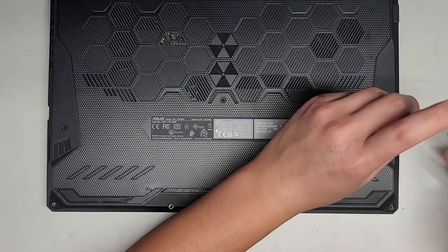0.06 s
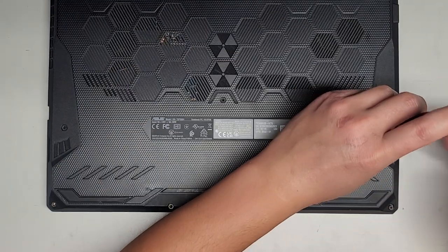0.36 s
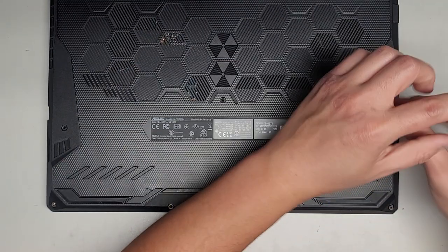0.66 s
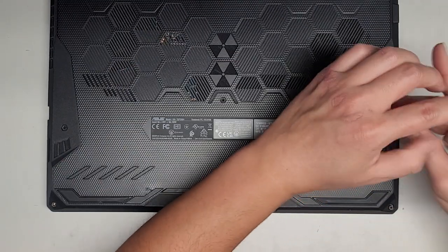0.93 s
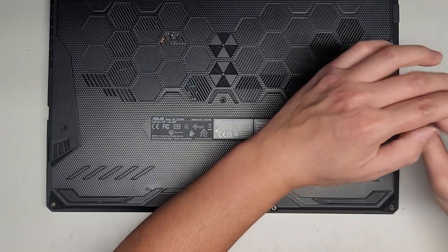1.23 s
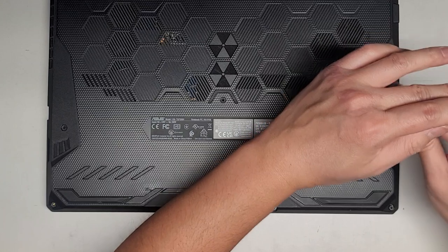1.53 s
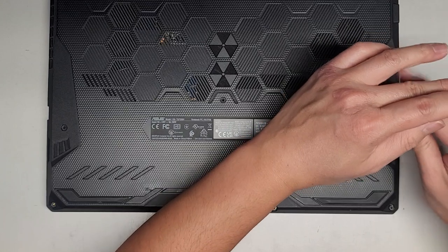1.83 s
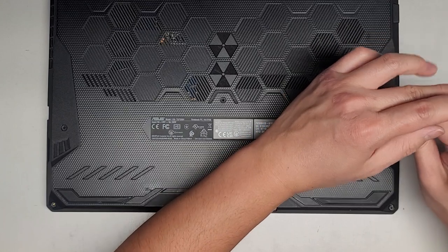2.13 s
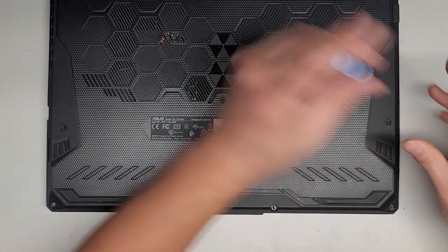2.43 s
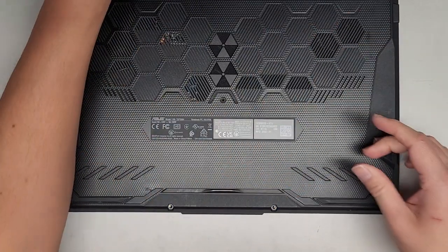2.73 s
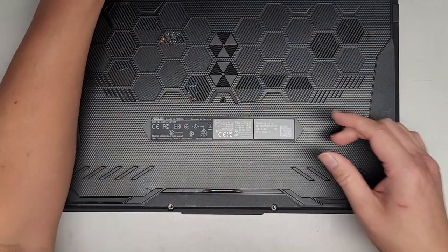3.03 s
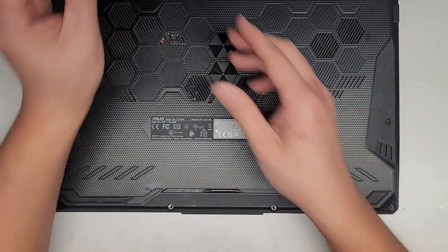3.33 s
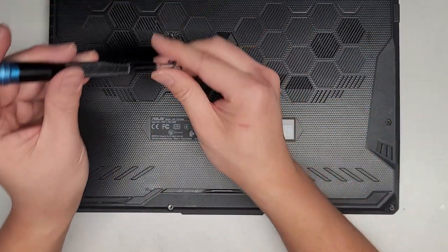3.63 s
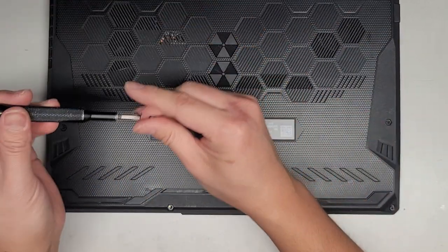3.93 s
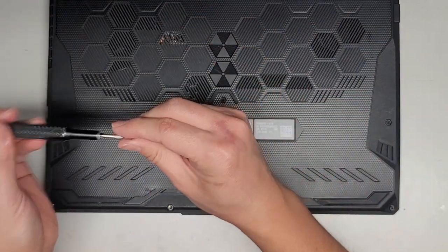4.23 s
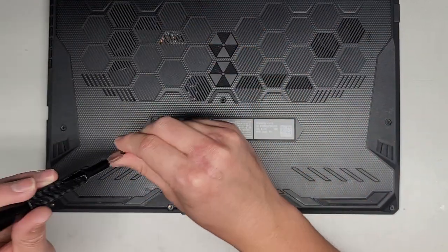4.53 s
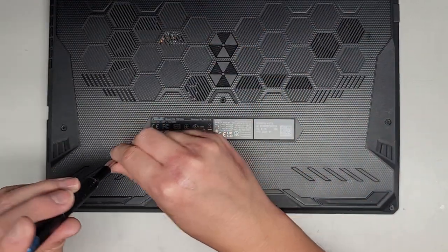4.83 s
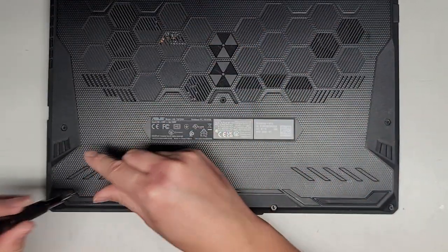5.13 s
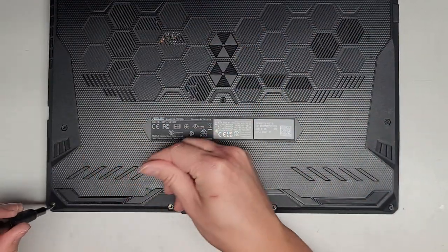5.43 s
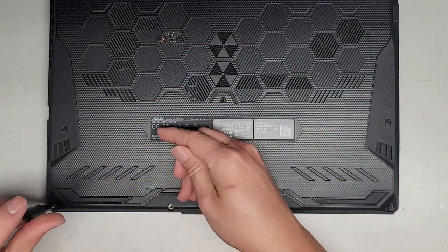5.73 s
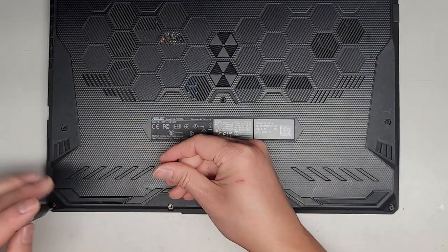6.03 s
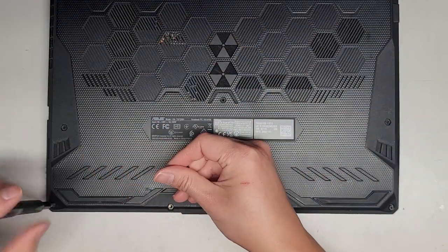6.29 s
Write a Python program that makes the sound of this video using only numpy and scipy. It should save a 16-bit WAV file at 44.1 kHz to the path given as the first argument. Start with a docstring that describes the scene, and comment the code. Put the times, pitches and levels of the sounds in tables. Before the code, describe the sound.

A deep thud, then plastic crunches and snaps twice as hands and a small screwdriver work on a laptop cover in a quiet room.

```python
"""A deep thud, then a crunch and snap of plastic: hands and a small screwdriver work on a laptop's
bottom cover, on a bench in a quiet room. Each touch is a short run of stick-slip friction that rings
the cover's resonances; twice its edge crunches and snaps home under pressure. The steel bit ticks
lightly on the screws, fingers rub the textured plastic, and pushes rock the bench in a few more thuds.
Faint room air and the low hum of a motor lie under everything."""
import sys
import numpy as np
from scipy import signal
from scipy.fft import rfft, irfft
from scipy.io import wavfile
from scipy.ndimage import uniform_filter1d

SR = 44100
rng = np.random.default_rng(int(sys.argv[2]) if len(sys.argv) > 2 else 0)


def wrap_up_sound(samples):
    """Save the sound to the file named by the first command line argument, as 16-bit audio."""
    columns = np.atleast_2d(samples).T
    # keep every value between -1 and 1, then stretch to whole-number steps
    tamed = np.clip(columns, -1, 1)
    steps = np.round(tamed * 32767).astype(np.int16)
    wavfile.write(sys.argv[1], SR, steps)


N = 289186
TOUCH_SAMPLES, LEAD_SAMPLES = 16384, 2048   # span of one touch, and the part kept for its build-up
CUTOFF_HZ = 15900


# Fingers and tool knock on the cover, or its edge snaps home. Each row: release time in seconds,
# build-up time constant in seconds, 60 dB decay time in seconds, base level in dB, treble lost to a
# soft contact in dB, resonance of the touched spot in Hz, its lift in dB.
COVER_TOUCHES = [(.3335, 0.0015, 0.063, -48.5, 23, 1680, 18), (.358, 0.00029, 0.04, -40.5, 56, 600, 4.5),
                 (.409, 0.0023, 0.2, -55.5, 23.5, 1760, 18), (.452, 0.0031, 0.081, -39.5, 33, 1700, 10),
                 (0.4936, 0.0048, 0.037, -33.5, 8, 1740, 12), (.677, 0.00045, .055, -63, 39, 1830, 19),
                 (.757, 0.0053, 0.074, -60.5, 21.5, 5150, 6.5), (.798, 0.006, .09, -58, 21, 635, -11),
                 (.81, 0.0056, .036, -52, 30, 640, -6), (.864, 0.0026, .034, -60, 22.5, 3330, 20.5),
                 (1.002, 0.0026, 0.05, -52, 16, 1750, 7.5), (1.103, 0.00065, 0.067, -53.5, 27, 4900, 10.5),
                 (1.428, 0.0082, 0.036, -47.5, 14.5, 800, 14), (1.457, .003, 0.047, -60, 1, 1090, 10),
                 (1.489, 0.007, 0.037, -51.5, 5, 6500, 6.5), (1.593, 0.0049, 0.046, -60.5, 10, 720, 8),
                 (1.608, 0.0037, .08, -62.5, 3, 614, 3), (2.395, 0.0022, 0.059, -59, 16, 6400, 13.5),
                 (2.739, 0.0047, 0.04, -61.5, 15, 1500, 11), (2.994, .002, 0.088, -72, -0.5, 9550, 13),
                 (3.044, 0.0018, 0.022, -45, 104, 1030, -2), (4.066, 0.0038, 0.16, -50, 8.5, 396, 7),
                 (5.522, 0.0045, 0.081, -49.5, 38.5, 1180, 7), (5.569, 0.00088, 0.061, -47, 56, 1200, 5),
                 (5.8793, .003, 0.074, -39, 9, 1660, 8), (5.8946, 0.00029, 0.027, -26, 28, 1100, 8.5),
                 (5.906, 0.0015, 0.023, -38, 10, 820, 6.5), (6.252, .0027, 0.071, -61.5, 13.5, 5900, 7),
                 (6.429, 0.0013, 0.032, -63.5, 22, 1050, 23.5), (6.445, 0.0025, 0.039, -59, 14, 2760, 8.5)]

def touches(snap_strength=1.21, sudden_s=0.00043):
    """Elastic release: slips grow and end in one snap, the stronger the more sudden the touch."""
    out = np.zeros((2, N + TOUCH_SAMPLES))
    for release_s, build_s, t60, level_db, loss_db, spot_hz, lift_db in COVER_TOUCHES:
        drive = slips(pressure(build_s, hold_s=0, swell_db=0, t60=t60))
        drive[LEAD_SAMPLES] += snap_strength / (1 + build_s / sudden_s)
        add_with_lead(out, release_s, cover(drive, level_db, loss_db, spot_hz, lift_db))
    return out[:, :N]


# The plastic creaks under pressure. Each row: start in seconds, hold in seconds, swell over the hold
# in dB, base level in dB, treble loss in dB, resonance of the spot in Hz, its lift in dB.
COVER_CREAKS = [(0.372, 0.095, 7, -46.5, 65, 1740, 7.5), (0.453, 0.034, 6.5, -39, 12.5, 1600, 5),
                (0.479, 0.017, 0.5, -38, 10, 1770, 7.5), (0.766, 0.15, -18, -63, 24, 1560, 11.5),
                (2.3, 0.055, -5, -67.5, 25, 1650, 10), (3.059, 0.027, 4, -70, 49, 470, 17),
                (4.079, 0.023, -12, -51.5, 19, 5600, 11.5), (5.883, 0.029, -15, -46, 6, 2480, 5)]

def creaks(attack_s=0.0011, release_t60=0.087):
    """Sustained stick-slip: under a held force the slips run on as a crunch, without a snap."""
    out = np.zeros((2, N + TOUCH_SAMPLES))
    for start_s, hold_s, swell_db, level_db, loss_db, spot_hz, lift_db in COVER_CREAKS:
        drive = slips(pressure(attack_s, hold_s, swell_db, release_t60))
        add_with_lead(out, start_s, cover(drive, level_db, loss_db, spot_hz, lift_db))
    return out[:, :N]


def pressure(build_s, hold_s, swell_db, t60):
    """Exponential loading: force builds, swells or eases while held, and decays once let go."""
    t = (np.arange(TOUCH_SAMPLES) - LEAD_SAMPLES) / SR
    build_up = np.exp(np.minimum(t, 0) / build_s)
    held_db = swell_db * np.clip(t / max(hold_s, 1 / SR), 0, 1)
    decay_db = 60 * np.maximum(t - hold_s, 0) / t60
    return build_up * from_db(held_db - decay_db)


def slips(force, slips_per_s=2600, spread_db=1):
    """Stick-slip friction: plastic gives way at random moments, each slip as strong as the force."""
    slipping = rng.random(TOUCH_SAMPLES) < slips_per_s / SR
    sizes = from_db(spread_db * np.clip(rng.standard_normal(TOUCH_SAMPLES), -2, 2))
    signs = rng.choice([-1, 1], TOUCH_SAMPLES)
    return unit_energy(force * slipping * sizes * signs)


# Registers of the cover, from knock to fizz. Each row: lower edge in Hz, upper edge in Hz, level offset
# in dB, share of the treble loss, side against mid in dB, reverberation time in seconds, pan in dB.
COVER_REGISTERS = [(215.2, 823, 1, 0.021, -10, 0.2, 1), (858, 2240, -.5, 0.12, -2.5, 0.19, -2.5),
                   (2570, 6330, 2.95, 0.36, 0, 0.19, -2.5), (7470, 22200, 2.7, 1, -0.5, 0.14, -2.5)]

def cover(drive, level_db, loss_db, spot_hz, lift_db):
    """Forced vibration: slips ring the cover and the touched spot; a soft contact excites less treble."""
    hz = np.arange(TOUCH_SAMPLES // 2 + 1) * SR / TOUCH_SAMPLES
    plate = cover_response(hz, scatter_db=2.2, direct_s=0.000465, sideways_s=0.0019)
    spot = mode_response(hz, spot_hz, lift_db, width_hz=0.18 * spot_hz)
    vibration = irfft(rfft(drive) * plate * spot)
    out = 0
    for low_hz, high_hz, register_db, loss_share, side_db, room_t60, pan_db in COVER_REGISTERS:
        register = band(vibration, low_hz, high_hz, order=4)
        register = with_room(register, room_t60, wet_db=-12, arrival_s=0.0042)
        spot_db = 0.49 * lift_db * (low_hz < spot_hz < high_hz)   # the spot's register shares its lift
        out += placed(register, level_db + register_db + spot_db - loss_share * loss_db, side_db, pan_db)
    return out


# Resonances of the cover. Each row: frequency in Hz, lift in dB (negative for a dip), width in Hz.
COVER_MODES = [(230.4, 8, 4.7), (295, -15.5, 97), (395, 8, 22), (442, 5, 21), (538.6, 5.5, 13),
               (606, 11, 39), (697.5, 9.5, 35), (790, -4.5, 210), (885, 3, 48), (1024, 1.5, 52),
               (1240, -7, 98), (1160, -0.5, 96), (1232, 13, 100), (1510, 11.5, 36), (1638, 6.5, 31),
               (1785, 8, 52), (2460, 7, 170), (2860, 8, 41), (3210, 7, 64), (3700, 1.5, 27),
               (4440, -2.5, 840), (5390, 2.5, 89), (6700, 2, 360)]

def cover_response(hz, scatter_db, direct_s, sideways_s):
    """Modal response of the cover, as mid and side: each spot weights the modes a little differently."""
    colour = 1
    for centre_hz, lift_db, width_hz in COVER_MODES:
        scattered_db = lift_db + scatter_db * rng.standard_normal()
        colour = colour * mode_response(hz, centre_hz, scattered_db, width_hz)
    return colour * np.array([dispersion(hz, direct_s), dispersion(hz, sideways_s)])


def mode_response(hz, centre_hz, lift_db, width_hz):
    """Damped resonance: one mode stands lift_db above its surroundings."""
    detuning = centre_hz ** 2 - hz ** 2
    damping = 1j * hz * width_hz
    return (detuning + damping * from_db(lift_db)) / (detuning + damping)


def dispersion(hz, travel_s, count=90):
    """Dispersion: bending waves cross the plate by many paths, treble first, smearing a slip in time."""
    knots_hz = np.geomspace(200, CUTOFF_HZ, count)
    group_delay_s = travel_s * (1000 / knots_hz) ** .25 * rng.exponential(1, count)
    phase_cycles = np.cumsum(np.interp(hz, knots_hz, group_delay_s)) * hz[1]
    return np.exp(-2j * np.pi * phase_cycles)


# The steel bit meets a screw. Each row: start in seconds, level in dB, ring frequency in Hz,
# ring against crack in dB.
SCREW_TICKS = [(3.042, -62, 9900, 3), (3.069, -68, 9700, 3), (3.711, -72, 10400, 1),
               (3.740, -66.5, 10000, 0), (4.128, -59.5, 9400, -12), (4.653, -57.5, 13300, 1),
               (4.836, -43, 6500, 0), (4.862, -69, 6950, -5), (4.973, -67.5, 2220, 1),
               (5.7302, -52, 6350, -42)]

def ticks(crack_t60, low_hz):
    """Hard impact: small steel parts meet with a thin crack and a short, bright ring."""
    out = np.zeros((2, N + TOUCH_SAMPLES))
    t = np.arange(TOUCH_SAMPLES) / SR
    decay = from_db(-60 * t / crack_t60)
    for start_s, level_db, ring_hz, ring_db in SCREW_TICKS:
        crack = band(rng.standard_normal((2, TOUCH_SAMPLES)) * decay, low_hz, CUTOFF_HZ)
        ring = resonance(resonance(crack, ring_hz, q=1.7), ring_hz, q=2.0)
        tick = unit_energy(crack) + from_db(ring_db) * unit_energy(ring)
        tick = with_room(tick, t60=0.108, wet_db=-13.5, arrival_s=0.013)
        start = round(start_s * SR)
        out[:, start:start + TOUCH_SAMPLES] += placed(tick, level_db, side_db=0.0, pan_db=-3.0)
    return out[:, :N]


# Fingers slide over the plastic. Each row: middle of the stroke in seconds, half length in seconds,
# rms level at the middle in dB.
FINGER_STROKES = [(2.27, .09, -87), (2.716, 0.016, -80), (3.056, 0.039, -68.5), (5.483, 0.072, -81.5),
                  (5.684, 0.106, -83.5), (6.288, .018, -81), (6.5, 0.02, -80.5)]

def rubs(grain_db):
    """Sliding friction: skin on the fine texture gives a faint, grainy hiss."""
    t = np.arange(N) / SR
    strokes = sum(from_db(level_db) * np.exp(-((t - middle_s) / half_s) ** 2)
                  for middle_s, half_s, level_db in FINGER_STROKES)
    grains = rng.standard_normal((2, N)) * from_db(grain_db * rng.uniform(-1, 1, N))
    hiss = band(grains, low_hz=2520, high_hz=15500, order=1)
    return left_right(strokes * hiss / hiss.std(), pan_db=-7.5)


# Deep thuds of bench and laptop body. Each row: time of the crest in seconds, pitch there in Hz,
# peak level in dB, rise in seconds, fall in seconds.
BENCH_THUDS = [(0.298, 74.6, -22, 0.014, 0.1), (.497, 114, -40.5, 0.0069, 0.031),
               (1.35, 66.4, -19, 0.034, 0.025), (2.8, 66.4, -32, 0.024, 0.06),
               (4.44, 59.3, -44.5, 0.069, .04), (5.92, 243, -41, .011, 0.012),
               (5.929, 127, -33.5, 0.028, 0.0075)]

def thuds(sag_s=0.084):
    """Load-dependent resonance: a push rocks bench and laptop, highest in pitch at the greatest load."""
    mid = np.zeros(N)
    for crest_s, hz, peak_db, rise_s, fall_s in BENCH_THUDS:
        t = np.arange(N) / SR - crest_s
        envelope = np.exp(-(t / np.where(t < 0, rise_s, fall_s)) ** 2)
        cycles = hz * sag_s * np.arctan(t / sag_s)   # an octave lower at sag_s from the crest
        mid += from_db(peak_db) * envelope * np.cos(2 * np.pi * cycles)
    side = from_db(-18) * np.gradient(mid) * SR / (2 * np.pi * 66)   # quadrature, 18 dB down at 66 Hz
    return left_right([mid, side], pan_db=1.5)


# Tones of a motor nearby. Each row: frequency in Hz, base rms level in dB.
MOTOR_TONES = [(56.8, -59.5), (114, -66.5)]

def hum(waver_db):
    """Periodic vibration: a motor gives two low tones, each wavering at random in level."""
    t = np.arange(N) / SR
    knots_s = np.arange(0, 7, .2)
    out = 0
    for hz, level_db in MOTOR_TONES:
        waver = np.interp(t, knots_s, rng.standard_normal(len(knots_s)))
        tone = np.sqrt(2) * np.sin(2 * np.pi * (hz * t + rng.random()))
        out += from_db(level_db + waver_db * waver) * tone
    return left_right([out, 0], pan_db=5.5)


# Spectrum of the still room. Each row: frequency in Hz, relative spectral density in dB.
AIR_SPECTRUM = [(18, -15.5), (29, -3), (42, -13.5), (57, -5), (85, -11), (130, -18), (230, -25.5),
                (800, -38.5), (3000, -46.5), (6800, -55.5), (7700, -71), (9000, -65.5), (11000, -60.5),
                (16000, -60.5)]
# Width of the room sound. Each row: frequency in Hz, side against mid in dB.
AIR_SPREAD = [(60, -24.5), (130, -10.5), (300, -8.5), (650, 1), (16000, 0)]

def room_air(gain_db=-67):
    """Diffuse noise: steady rumble and hiss, alike in both channels only in the bass."""
    hz = np.arange(N // 2 + 1) * SR / N
    colour = from_db(at_hz(AIR_SPECTRUM, hz))
    midrange = (hz > 200) & (hz < 7000)
    colour /= np.sqrt(np.mean(colour ** 2 * midrange))
    mid, side = rfft(rng.standard_normal((2, N))) * colour
    side *= from_db(at_hz(AIR_SPREAD, hz))
    return from_db(gain_db) * left_right([irfft(mid, N), irfft(side, N)], pan_db=-0.1)


# Course of the low rumble and hum. Each row: time in seconds, level in dB, taken relative to the mean.
BASS_SWELL = [(0.7, -53.5), (2.74, -54), (5.25, -58.5), (5.71, -56), (6.56, -55.5)]

def background(bass_hz):
    """Slow amplitude modulation: the bass of air and hum sinks and swells."""
    steady = room_air() + hum(waver_db=2.5)
    bass = signal.sosfiltfilt(signal.butter(2, bass_hz, fs=SR, output="sos"), steady)
    swell_db = np.interp(np.arange(N) / SR, *np.transpose(BASS_SWELL))
    return steady + bass * (from_db(swell_db - swell_db.mean()) - 1)


def with_room(x, t60, wet_db, arrival_s):
    """Reverberation: diffuse reflections gather after the direct sound and decay exponentially."""
    t = np.arange(TOUCH_SAMPLES) / SR
    gathering = 1 - np.exp(-(t / arrival_s) ** 2)
    tail = unit_energy(rng.standard_normal((2, TOUCH_SAMPLES)) * gathering * from_db(-60 * t / t60))
    return x + from_db(wet_db) * signal.fftconvolve(x, tail, axes=-1)[:, :TOUCH_SAMPLES]


def add_with_lead(out, time_s, sound):
    """Superposition: a sound of the cover joins the scene, its build-up ahead of time_s."""
    start = round(time_s * SR) - LEAD_SAMPLES
    out[:, start:start + TOUCH_SAMPLES] += sound


def placed(mid_side, level_db, side_db, pan_db):
    """Decorrelation gives width: the side keeps what the mid lacks; the loudest 5 ms set each level."""
    mid, side = mid_side
    pair = np.array([mid, side - mid * (side @ mid) / (mid @ mid)])
    power = uniform_filter1d(pair ** 2, size=SR // 200)
    crest_rms = np.sqrt(power.max(axis=-1, keepdims=True) + 1e-20)
    return left_right(pair / crest_rms * from_db(level_db) * from_db([[0], [side_db]]), pan_db)


def left_right(mid_side, pan_db):
    """Sum and difference turn mid and side into two channels, leaning left by pan_db."""
    mid, side = mid_side
    return np.array([mid + side, mid - side]) * from_db([[pan_db / 2], [-pan_db / 2]])


def resonance(x, hz, q):
    """Second-order resonator with a gain of one at its centre."""
    return signal.lfilter(*signal.iirpeak(min(hz, .45 * SR), max(q, 1), fs=SR), x)


def band(x, low_hz, high_hz, order=3):
    """Causal band-pass filter."""
    edges_hz = [low_hz, min(high_hz, .45 * SR)]
    return signal.sosfilt(signal.butter(order, edges_hz, "band", fs=SR, output="sos"), x)


def at_hz(points, hz):
    """Interpolation of a spectrum on a log-frequency axis."""
    knots, values = np.transpose(points)
    return np.interp(np.log(np.maximum(hz, 1)), np.log(knots), values)


def unit_energy(x):
    """Normalisation of each row to an energy of one."""
    return x / np.sqrt(np.sum(x ** 2, axis=-1, keepdims=True) + 1e-20)


def from_db(db):
    """Decibels to amplitude ratio."""
    return 10 ** (np.asarray(db) / 20)


def scene():
    """Superposition: the work on the cover adds to the sound of the room."""
    work = touches() + creaks() + ticks(crack_t60=0.032, low_hz=1910) + rubs(grain_db=4.5) + thuds()
    return work + background(bass_hz=197)


def record(dry):
    """Frequency response of the microphone: a narrow dip in the treble, then a steep low-pass."""
    dipped = dry - resonance(dry, hz=7930, q=12.6)
    return signal.sosfilt(signal.ellip(12, .1, 80, CUTOFF_HZ, fs=SR, output="sos"), dipped)


dry = scene()
out = record(dry)
wrap_up_sound(out)
```